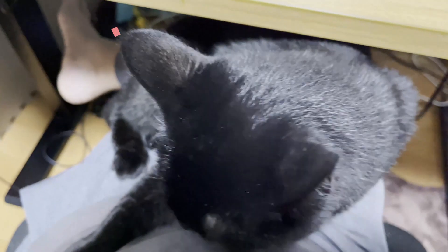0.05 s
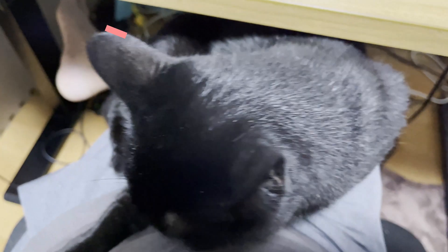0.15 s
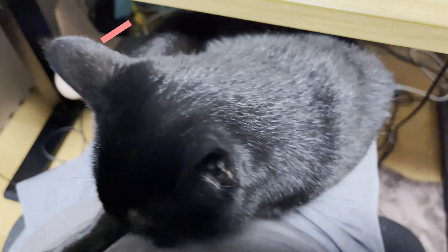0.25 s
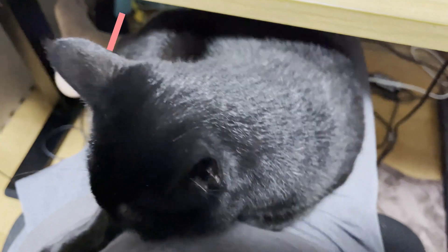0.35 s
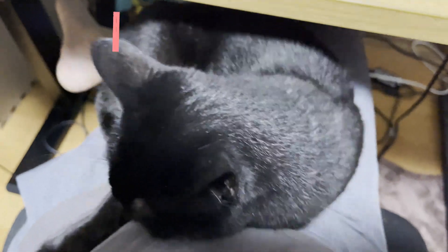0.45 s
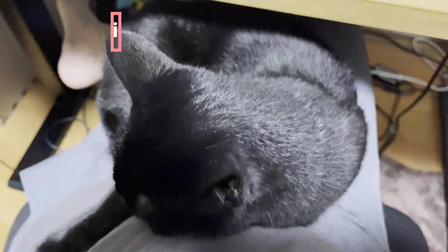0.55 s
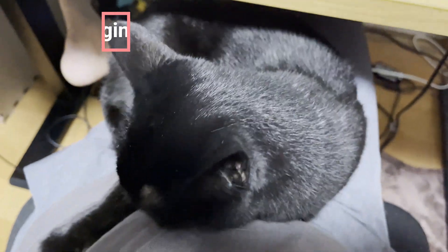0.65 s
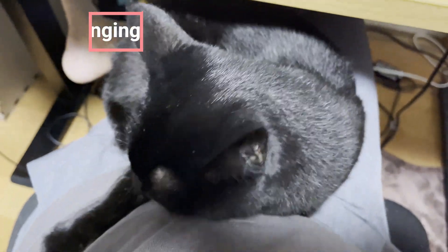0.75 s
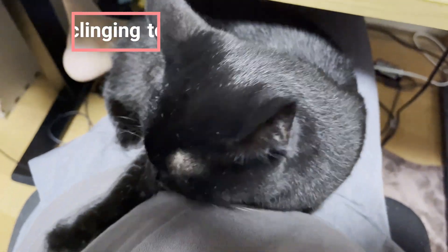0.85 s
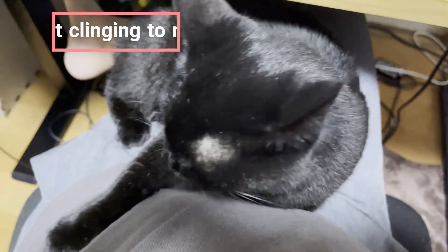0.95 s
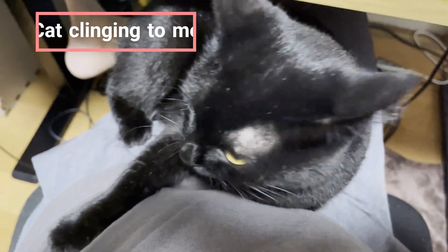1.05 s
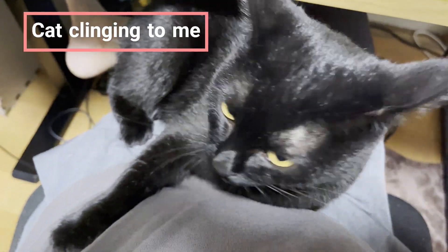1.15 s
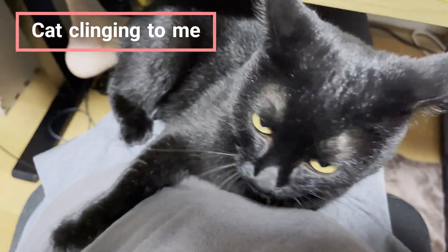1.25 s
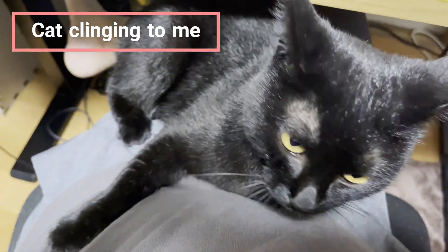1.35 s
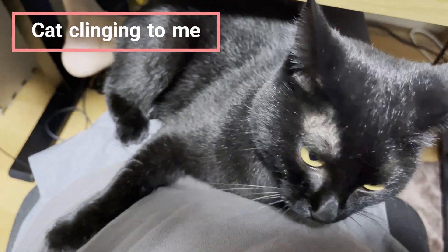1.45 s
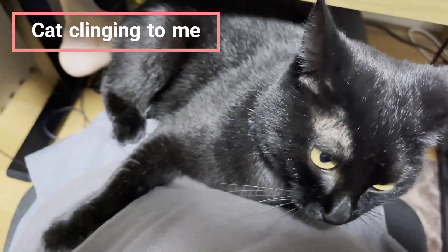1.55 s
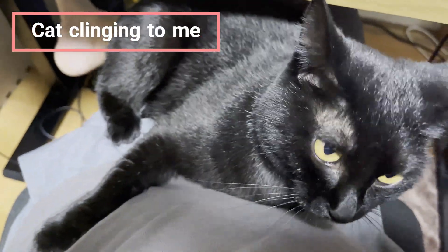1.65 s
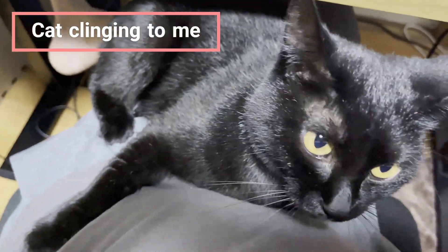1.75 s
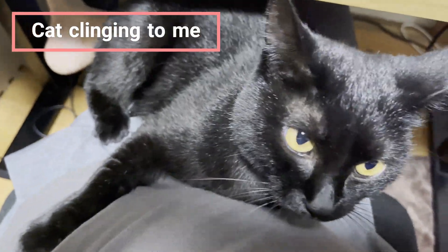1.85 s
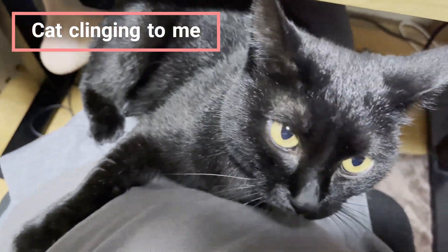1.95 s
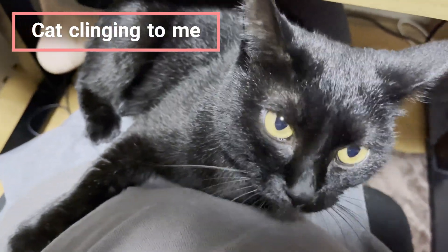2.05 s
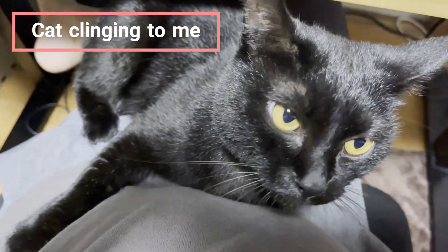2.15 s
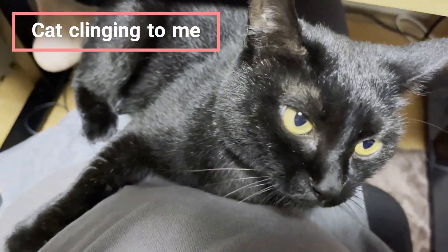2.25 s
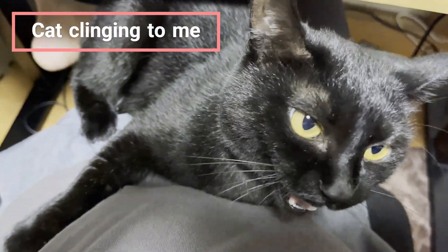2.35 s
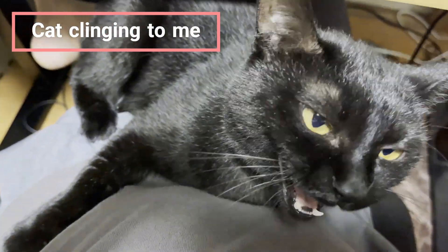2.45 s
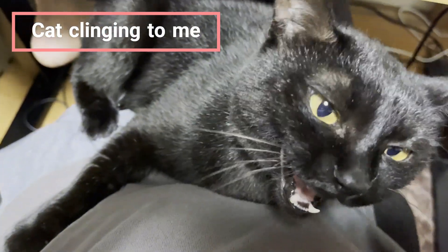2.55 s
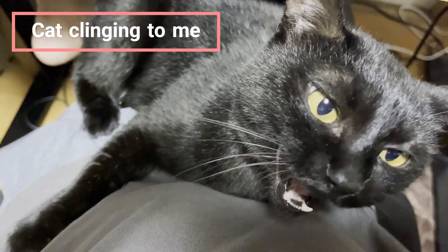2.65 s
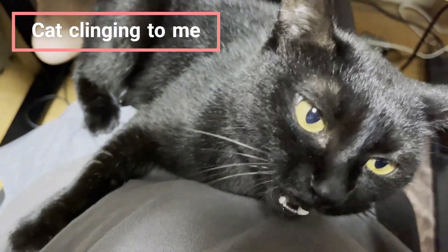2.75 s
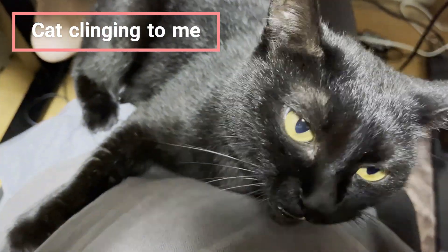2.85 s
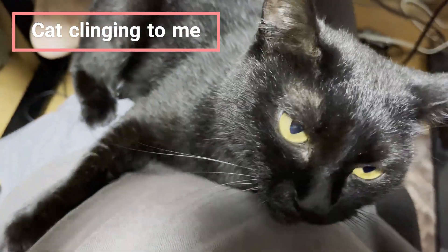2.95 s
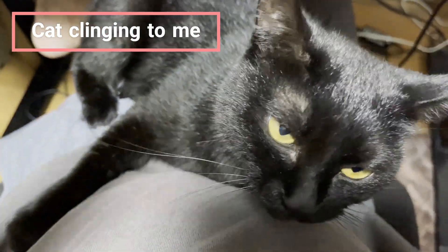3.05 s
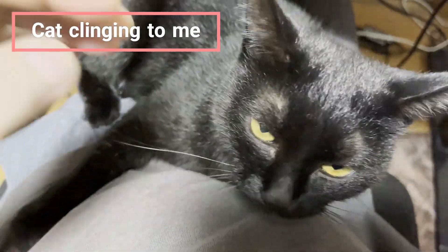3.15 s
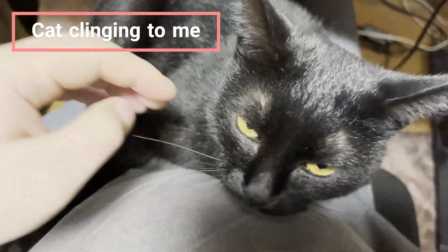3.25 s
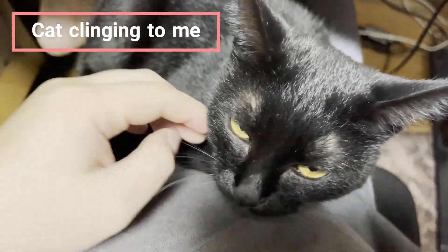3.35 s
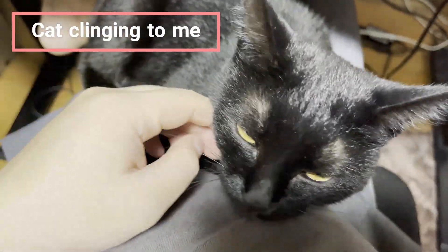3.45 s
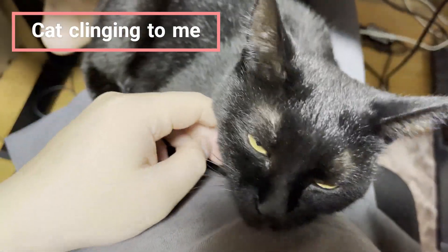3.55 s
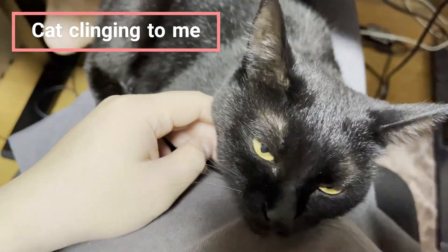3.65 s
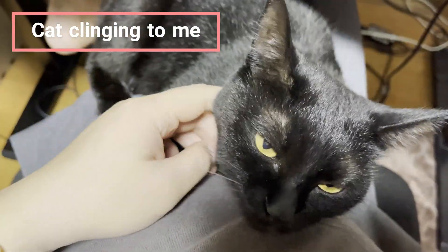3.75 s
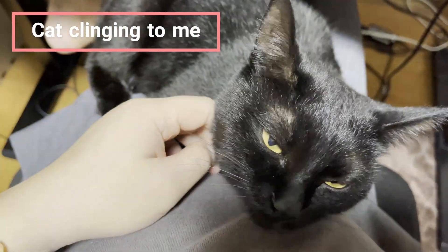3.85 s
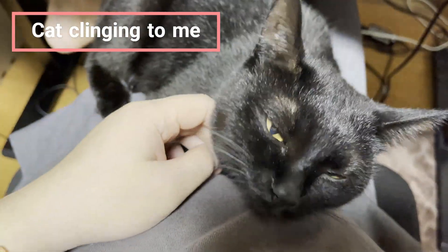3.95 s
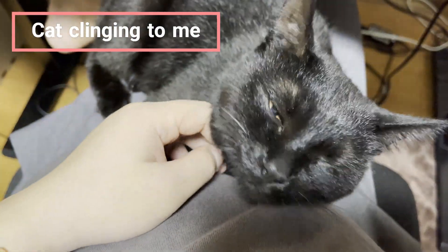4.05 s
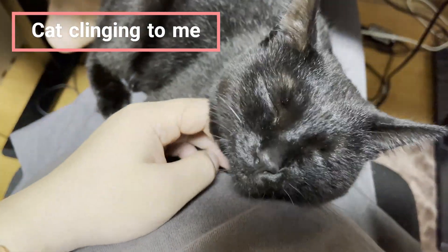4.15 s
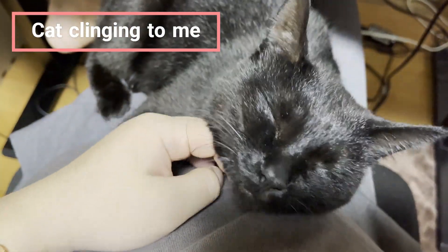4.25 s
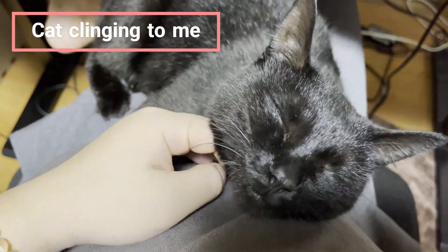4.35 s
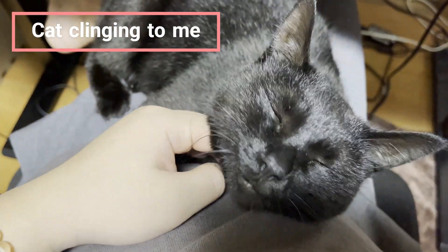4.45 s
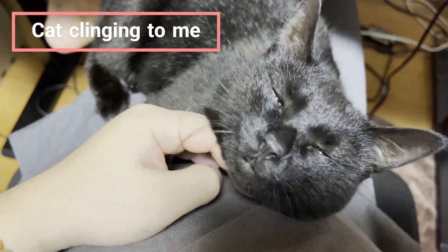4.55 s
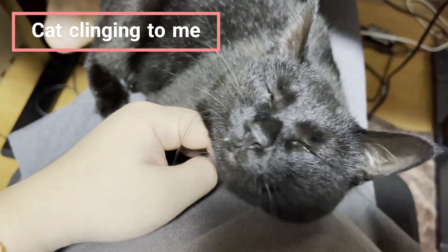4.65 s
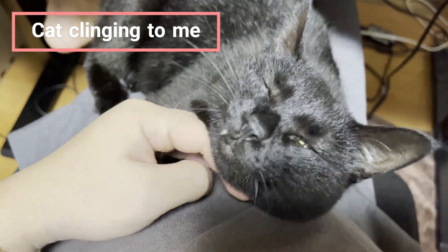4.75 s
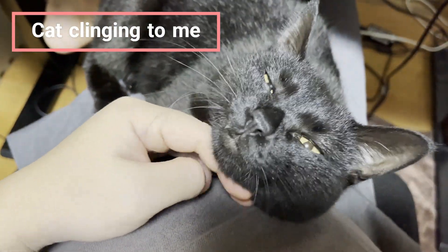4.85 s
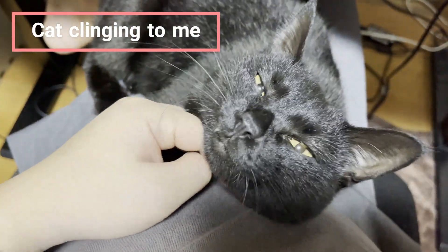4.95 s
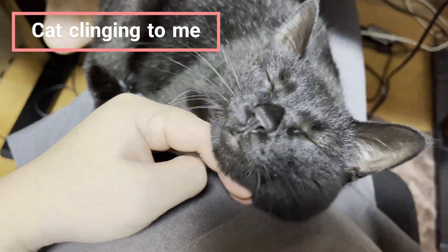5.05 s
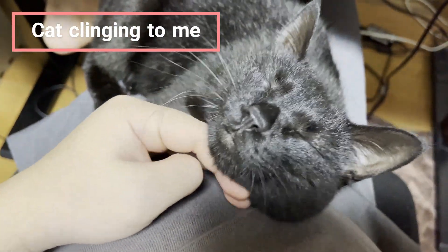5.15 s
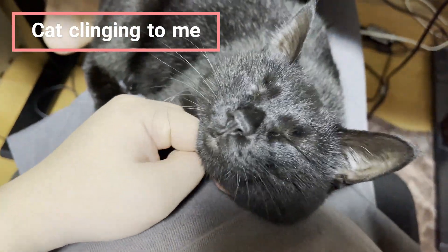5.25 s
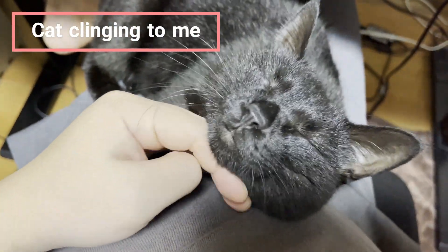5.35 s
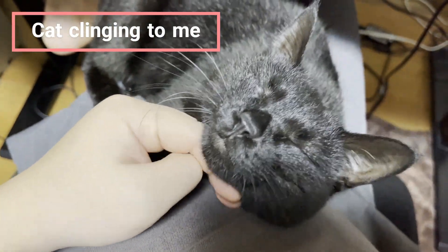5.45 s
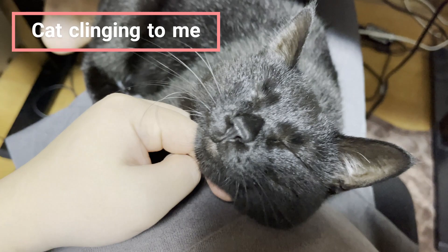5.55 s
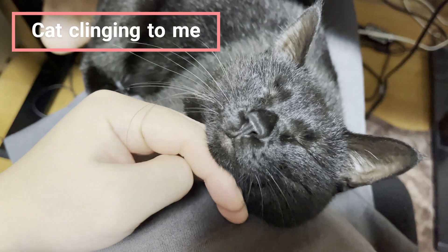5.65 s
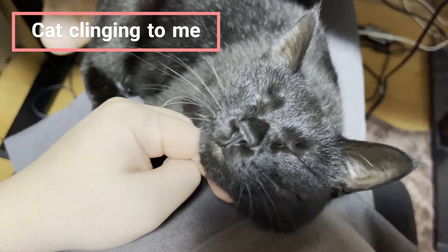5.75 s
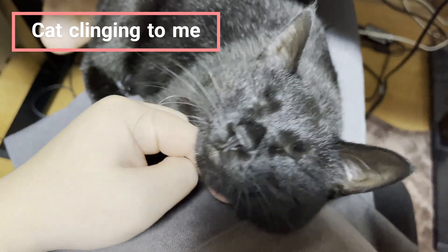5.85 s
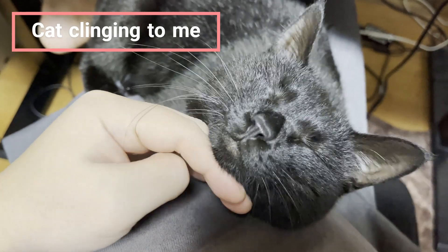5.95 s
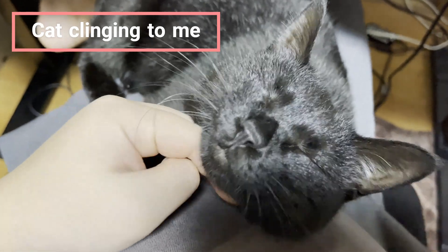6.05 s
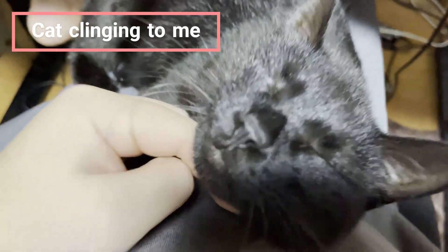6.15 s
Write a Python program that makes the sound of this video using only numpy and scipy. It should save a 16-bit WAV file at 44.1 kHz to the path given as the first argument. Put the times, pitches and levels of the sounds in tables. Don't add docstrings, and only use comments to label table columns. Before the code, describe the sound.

Close stereo phone pickup in a small, dampened room, with low handling rumble and faint airy hiss throughout. From 0 to 0.55 s cloth whispers and crinkles as the cat turns, over a very faint purr of about 25 pulses a second. From 0.6 to 1.4 s single soft throat knocks come unevenly and grow, leading into the strongest rattling out-breath at 1.45-1.75. A softer thumping in-breath follows around 1.9-2.2. Wet clicks at 2.23 open a mew from 2.3 to 3.05, pitched near 500 Hz, bright at first, then muffled and fluttering as the mouth closes, ending with a lip smack. From 3.25 purring returns in short waves, with a rattle near 3.9. Fingers stroke fur from then on, clearer after 4.0, in quick to-and-fro hisses. Wet tongue clicks and a small scrape come near 5.0; purring and stroking continue to 6.2.

```python
import sys
import numpy as np
from scipy import signal
from scipy.fft import rfft, irfft, next_fast_len
from scipy.io import wavfile
from scipy.ndimage import uniform_filter1d, map_coordinates

SR = 44100
rng = np.random.default_rng(int(sys.argv[2]) if len(sys.argv) > 2 else 0)


def generate_wav(signal):
    frames = np.transpose(np.atleast_2d(signal))
    scaled = np.clip(frames, -1, 1) * 32767
    pcm = np.round(scaled).astype(np.int16)
    wavfile.write(sys.argv[1], SR, pcm)


def makeup_ratio(level_db):
    decades = np.asarray(level_db, float) / 20
    return 10 ** decades


N = 272979
T = np.arange(N) / SR

# first t/s, last t/s, twitch rate f/Hz, rattle f/Hz
OUT_BREATHS = [
    (1.448, 1.76, 27.3, 170),
    (3.861, 4.22, 28.3, 160),
    (4.905, 5.15, 27.6, 110),
    (5.99, 6.18, 27.5, 150),
]
# f/Hz, left over right level/dB, right leads phase/rad, likeness of near sound
PORTS = [(60, 4, 0, .95), (500, 7, 0, .95), (1200, 3, -.1, .97), (2200, 2, -1, .93), (2900, 3, .3, .8),
         (3500, 1, 1.7, .85), (4200, 6, 1.3, .85), (4900, 16, -1.4, .7), (5600, 12, -2.9, .8),
         (6400, 6, -2.6, .8), (7000, -2, -1.2, .7), (8000, -1, -.2, .8), (9000, 1, .7, .87),
         (10000, 1, 3, .96), (11000, 1, 4.4, .93), (12000, 0, 6.28, .99)]
# f/Hz, likeness
FAR = [(60, .9), (200, .65), (400, .3), (900, .1), (6000, .1), (9000, .5), (12000, .7)]


def unit(x):
    return x / np.sqrt(np.mean(x ** 2) + 1e-20)


def along(points, x):
    f, *cols = np.transpose(points)
    return np.squeeze([np.interp(np.log(x + 1), np.log(f + 1), c) for c in cols])


def curves(*tables):
    s, *cols = np.concatenate(tables).T
    return [np.interp(T, s, c) for c in cols]


def swell(rows):
    rises = []
    for s, db, rise, fade in rows:
        rises.append(np.interp(T, [s - 4 * abs(rise), s, s + 4 * abs(fade)], [db - 80, db, db - 80]))
    return np.max(rises, 0)


def wobble(rate):
    return map_coordinates(rng.standard_normal(int(N * rate / SR) + 4), [T * rate])


def filtered(x, response):
    m = next_fast_len(N + SR // 2)
    return irfft(rfft(x, m) * response(np.fft.rfftfreq(m, 1 / SR)), m)[..., :N]


def ring(hz, width):
    return lambda f: 1j * f * width / (hz * hz - f * f + 1j * f * width)


def rush(spectrum, alike, grain_db=0.0):
    pair = rng.standard_normal((2, N)) * makeup_ratio(grain_db * wobble(700))
    closed = [(spectrum[0][0] / 2, -120)] + list(spectrum) + [(spectrum[-1][0] * 1.2, -120)]

    def mid_side(hz):
        turn = np.arccos(np.clip(alike(hz), -1, 1)) / 2
        return makeup_ratio(along(closed, hz)) * [np.cos(turn), np.sin(turn)]
    mid, side = filtered(pair, mid_side)
    return unit(np.array([mid + side, mid - side]))


def add(track, s, x):
    part = track[round(s * SR):][:len(x)]
    part += x[:len(part)]


def thump(top_hz, end_hz, fall, t60, attack=0.0048):
    t = np.arange(SR // 12) / SR
    hz = end_hz + (top_hz - end_hz) * np.exp(-t / fall)
    swing = np.sin(2 * np.pi * np.cumsum(hz) / SR)
    return swing * makeup_ratio(-60 * t / t60) * (1 - np.exp(-t / attack))


def room(x, wet_db):
    # f/Hz, t60/s
    walls = [(200, 0.047), (1500, 0.21), (8000, 0.043)]
    hz, t, z = signal.stft(rng.standard_normal((2, SR // 3)), SR, nperseg=256)
    tail = signal.istft(z * makeup_ratio(-60 * t / along(walls, hz)[:, None]), SR, nperseg=256)[1]
    tail = tail / np.linalg.norm(tail[0])
    late = np.pad(x, (200, 0))[None]
    return x + makeup_ratio(wet_db) * signal.fftconvolve(late, tail, axes=1)[:, :N]


def background():
    # t/s, level/dB
    grip = [(0, -79.5), (.4, -74), (.8, -71.5), (1.05, -73.5), (1.4, -68), (2.1, -69.5), (2.5, -70),
            (3.0, -67.5), (3.38, -71.5), (3.6, -67), (4.05, -65), (4.5, -65.5), (4.78, -67), (4.88, -66),
            (5.08, -67), (5.25, -72), (5.6, -66.5), (6.19, -68.5)]
    # strongest t/s, level/dB, time to swell 20 dB /s, to fade 20 dB /s
    shifts = [
        (.4, -72, 0.26, 0.7),
        (2.05, -78.5, 1.8, 0.89),
        (2.3, -70, 0.27, 1.6),
        (4.72, -76, 4.7, 2.3),
    ]
    sniffs = [(0, -63.5, 1., 4.8), (1.13, -63.5, 1.9, 1.3), (1.97, -56.5, 0.34, 0.82),
              (2.6, -62.5, 3.1, 3.4), (3.51, -64.5, 0.26, 0.77), (4.75, -65, 0.88, 0.73),
              (6.06, -56.5, 0.086, 0.22), (6.14, -54, 0.17, 0.061)]
    # f/Hz, level/dB
    rumble_spectrum, hiss_spectrum = [(15, -39), (30, -6), (55, 0), (90, -9), (150, -12), (300, -21),
                                      (700, -45.5)], [(100, 10.5), (300, 13.5), (800, 7), (1500, 10),
                                                      (3000, 1), (5000, -6), (6300, -1), (10000, -4),
                                                      (12500, -10), (13200, -24.5), (15300, -31.5)]
    nose_spectrum = [(300, -14.0), (480, -1.5), (600, -2.5), (720, -11.5), (900, -17.0)]

    def far(hz):
        return along(FAR, hz)
    rumble_db = curves(grip)[0] + 3 + 1.6 * wobble(9)
    hiss_db = np.maximum(swell(shifts), -82) + 3.5 + 1.2 * wobble(8.7)
    air_db = swell(sniffs) - 11.0 + 0.56 * wobble(15)
    rumble = makeup_ratio(rumble_db) * rush(rumble_spectrum, far)
    hiss = makeup_ratio(hiss_db) * rush(hiss_spectrum, far)
    return rumble + hiss + makeup_ratio(air_db) * rush(nose_spectrum, far)


def cloth():
    # strongest t/s, level/dB, time to swell 20 dB /s, to fade 20 dB /s
    whispers = [
        (0, -73, .1, .6),
        (.24, -74.5, 2., .55),
        (.55, -73, .25, .045),
        (.76, -91, .3, .25),
    ]
    crinkles = [
        (.05, -87.5, 0.18, 2.9),
        (.5, -78.5, .03, 1.1),
        (.72, -92.5, 0.36, 0.11),
    ]
    rubs = [
        (0, -70, .1, 2.8),
        (.39, -69, 1.3, 0.44),
        (.52, -72, .2, 0.048),
        (.72, -75, 0.069, 0.15),
    ]
    scuffs = [
        (.3, -77.5, .02, 0.42),
        (.52, -75, 0.046, .06),
        (4.95, -71, .01, .05),
        (5.063, -74.5, .04, 0.037),
        (5.09, -84, .03, .04),
    ]
    # f/Hz, level/dB
    rub_spectrum = [(100, -15), (200, 4.5), (500, -6.5), (900, -2.5), (1600, -3), (3000, -15), (7000, -28),
                    (9000, -53)]
    whisper_spectrum = [(7700, -21), (8050, 7.0), (8500, -3), (9100, -12.0)]
    crinkle_spectrum = [(8500, -9), (9300, 10.0), (10800, 7.0), (12300, -11.0)]
    scuff_spectrum = [(2300, -23), (3000, -6.5), (3900, 1.5), (4500, -7.5), (5600, -21)]

    turning = T < .575
    crinkle_db = np.where(turning, swell(crinkles), swell(crinkles[-1:])) + 7
    rub_db = np.where(turning, swell(rubs), swell(rubs[-2:])) + 2.0 + 1.7 * wobble(14)
    whisper = makeup_ratio(swell(whispers)) * rush(whisper_spectrum, lambda hz: 0.69 + 0 * hz, grain_db=-1.5)
    whisper = whisper * makeup_ratio([[-3.5], [3.5]])
    crinkle = makeup_ratio(crinkle_db) * rush(crinkle_spectrum, lambda hz: 0.5 + 0 * hz, grain_db=3.5)
    rub = makeup_ratio(rub_db) * rush(rub_spectrum, lambda hz: along(FAR, hz), grain_db=0.5)
    scuff = makeup_ratio(swell(scuffs)) * rush(scuff_spectrum, lambda hz: 0.7 + 0 * hz, grain_db=2.0)
    return scuff + whisper + crinkle + rub


def strokes():
    # t/s, share spent speeding up, hiss level/dB, drag level/dB
    to_and_fro = [(3.25, 0.94, -90.5, -85.5), (3.679, 0.095, -84.5, -85), (4.0, 0.78, -75, -76),
                  (4.11, 0.43, -67.5, -72), (4.349, 0.64, -74, -78.5), (4.461, 0.24, -72.5, -74),
                  (4.6, 0.99, -75, -87), (4.715, 0.41, -69, -73.5), (4.868, 0.53, -63, -76.5),
                  (5.006, 0.41, -67.5, -77), (5.152, 0.58, -63.5, -72.5), (5.29, 0.25, -74, -74.5),
                  (5.427, 0.64, -63, -71), (5.561, 0.28, -72, -70), (5.699, 0.7, -66, -70),
                  (5.841, 0.36, -69, -70.5), (5.989, 0.74, -74, -67), (6.13, 0.1, -75, -73.5)]
    start, share, hiss_db, drag_db = np.transpose(to_and_fro)
    edges = np.append(start, 6.24)
    fastest = start + np.clip(share, .1, .9) * np.diff(edges)
    turns = np.interp(T, np.sort(np.append(edges, fastest)), np.arange(2 * len(start) + 1) / 2)
    speed = np.hypot(np.sin(np.pi * turns), 0.12)
    speed_db = 20 * np.log10(speed) - 60 * (T < start[0])
    hiss_power, drag_power = 1.46, 1.14
    fine_db = np.interp(T, fastest, hiss_db) + hiss_power * speed_db
    return fine_db, np.interp(T, fastest, drag_db) + drag_power * speed_db


def fur():
    # f/Hz, level/dB
    fine_spectrum, drag_spectrum = [(5500, -54), (7000, -10), (8500, -3.5), (9500, 2.5), (10700, 10),
                                    (11800, 0), (12600, -23), (14000, -28), (15500, -51)], [(500, -77), (1000, 1), (1700, -1.5), (2500, -6.5),
                                                  (3500, -1), (5000, -5.5), (6500, -1.5), (8000, -3.5)]
    fine_db, drag_db = strokes()
    fine_db = fine_db + 4.0 + 1.34 * wobble(30) + 1.04 * wobble(110)
    drag_db = drag_db - 1.0 + 1.37 * wobble(24)
    drag_alike = [(1900, .3), (2600, -.9), (3300, .3)]
    fine = rush(fine_spectrum, lambda hz: along(PORTS, hz)[2], grain_db=1.5)
    drag = rush(drag_spectrum, lambda hz: along(drag_alike, hz), grain_db=2.5)
    return makeup_ratio(fine_db) * fine + makeup_ratio(drag_db) * drag


def nose():
    # strongest t/s, level/dB, time to swell 20 dB /s, to fade 20 dB /s
    nostril_air = [
        (1.5, -90, 0.33, .5),
        (1.69, -83.5, 0.32, 0.2),
        (1.76, -85.5, .2, .08),
    ]
    # f/Hz, level/dB
    nostrils = [(5000, -14), (6200, -3), (7700, 0), (9200, -5), (11000, -3)]
    first, _, rate, _ = OUT_BREATHS[0]
    spurt_db = 5 * np.cos(2 * np.pi * rate * (T - first - .006))
    return makeup_ratio(swell(nostril_air) + spurt_db) * rush(nostrils, lambda hz: 0.25 + 0 * hz)


def murmur():
    # strongest t/s, level/dB, time to swell 20 dB /s, to fade 20 dB /s
    loose = [(.8, -74, .5, 1), (1.2, -68, 0.63, 0.27), (1.6, -60.5, .3, 0.21), (2.55, -71.5, .3, 0.98),
             (3.02, -66.5, 0.12, 0.17), (3.45, -77, 0.21, 0.74), (3.95, -72.5, 0.28, 0.17),
             (4.45, -78, 0.34, 0.67)]
    exhales = [
        (1.6, -75.5, 0.5, 0.24),
        (1.755, -75, 0.044, 0.061),
        (3.95, -82.5, 0.1, 0.41),
    ]
    # f/Hz, level/dB
    fold_spectrum = [(90, -16.5), (150, 2), (300, 4), (550, -7.5), (720, -18.5), (900, -26)]
    air_spectrum = [(800, -12.5), (1100, 4), (1600, -1), (2100, -7.5), (2600, -10.5), (3000, -20)]
    folds = makeup_ratio(swell(loose) + 0.83 * wobble(60)) * rush(fold_spectrum, np.ones_like)[0]
    return folds + makeup_ratio(swell(exhales) + 3.1 * wobble(90)) * rush(air_spectrum, np.ones_like)[0]


def smacks():
    # t/s, plop level/dB, plop f/Hz, tick level/dB
    clicks = [(.408, -58, 1500, -80), (0.428, -59, 325, -101), (2.233, -59, 1720, -82),
              (2.242, -59, 1480, -79), (2.272, -51, 1400, -75), (2.278, -47.5, 610, -74),
              (2.279, -64, 5050, -99), (2.272, -57, 1950, -99), (2.298, -35.5, 1590, -64),
              (2.3868, -46, 2540, -42), (2.3842, -51, 6300, -99), (2.3846, -56, 4570, -99),
              (2.437, -59, 2100, -44.5), (2.436, -52, 5930, -99), (2.4363, -54, 4300, -99),
              (2.675, -41, 1136, -62.5), (2.994, -52, 1506, -55), (3.002, -47.5, 330, -80),
              (3.005, -52, 1570, -80), (3.018, -52, 1310, -82), (3.024, -53, 1490, -80),
              (3.002, -57, 188, -88.5), (3.05, -49.5, 420, -90), (3.062, -62, 330, -90),
              (3.382, -50.5, 543, -87.5), (3.382, -69.5, 1300, -97), (3.901, -54.5, 1100, -73),
              (3.934, -58, 1100, -67), (4.036, -59, 1340, -71), (4.108, -62, 1150, -90),
              (4.178, -61, 1230, -90), (4.535, -57, 1070, -93), (4.947, -84.5, 1295, -64),
              (4.963, -49, 105, -75), (4.985, -46.5, 115, -90), (4.982, -53.5, 920, -60),
              (5.017, -44.5, 1040, -51.5), (5.017, -43, 500, -99), (5.0175, -61, 3630, -99),
              (5.0163, -59, 8150, -99), (4.982, -65, 3500, -99), (5.065, -58, 1190, -82),
              (5.549, -56.5, 142, -99)]
    # strongest t/s, level/dB, time to swell 20 dB /s, to fade 20 dB /s
    whistles = [
        (2.87, -68.5, .06, .2),
        (2.93, -65.5, .15, 0.097),
        (2.97, -75, .1, 0.034),
    ]
    tongue = [
        (4.95, -78, 0.012, .04),
        (4.962, -76, 0.018, 0.043),
        (5.063, -63.5, 0.028, 0.036),
        (5.085, -72, 0.037, 0.06),
        (5.12, -80, 0.049, 0.049),
    ]
    puffs = [
        (2.673, -64.5, .004, 0.011),
        (2.995, -57.5, 0.012, 0.025),
        (3.01, -62, 0.051, 0.075),
        (3.05, -78.5, 0.13, 0.1),
    ]
    # f/Hz, level/dB
    gap, wet, lips = [(3300, -18), (3800, 6), (4300, -13), (7500, -21), (8600, -17), (10000, -9.5),
                      (11500, -22)], [(700, -17.5), (1100, 4), (1500, -8), (2000, -26), (3200, -25.5),
                                   (3850, -5), (4400, -23)], [(1500, -13.5), (3100, -16.5), (3850, -4.5),
                                                       (4500, -11.5), (6800, -6), (8300, -12), (10200, 5.5),
                                                       (11800, -21)]

    plops, ticks = np.zeros((2, N))
    t = T[:500]
    for s, plop_db, hz, tick_db in clicks:
        attack = min(.0006 + .7 / hz, .0022)
        add(plops, s, makeup_ratio(plop_db + 7) * thump(1.2 * hz, .8 * hz, .003, .007 + 6 / hz, attack=attack))
        burst = rng.standard_normal(500) + 4 * (t == 0)
        add(ticks, s, makeup_ratio(tick_db + 8 - 60 * t / .012) * burst)

    def mouth(f):
        low, middle = 0.28 * ring(1400, 800)(f), 1.8 * ring(3500, 1000)(f) ** 2
        high = 0.83 * ring(7500, 2600)(f) ** 3
        return (low - middle + high) / (1 + (f / 9000) ** 6)
    whistle = makeup_ratio(swell(whistles)) * rush(gap, np.ones_like, grain_db=-1.0)[0]
    licks = makeup_ratio(swell(tongue)) * rush(wet, np.ones_like, grain_db=3.5)[0]
    puff = makeup_ratio(swell(puffs)) * rush(lips, np.ones_like, grain_db=2.0)[0]
    return plops + filtered(ticks, mouth) + whistle + licks + puff


def mew():
    # t/s, pitch f/Hz, level/dB, mouth resonance f/Hz
    opening, shut = [(2.297, 451, -43, 2190), (2.38, 517.2, -36, 2500), (2.412, 539, -35, 2800),
                     (2.445, 532.3, -34.5, 2628), (2.49, 546.8, -32.5, 2750), (2.54, 557, -33, 2370),
                     (2.58, 546.8, -31.5, 2160), (2.615, 525.7, -35.5, 1626), (2.672, 514.3, -42, 1440)], [(2.688, 511.5, -35.5, 1400), (2.714, 508, -37, 1400),
                                       (2.742, 491.4, -37.5, 1400), (2.815, 500.5, -38, 1400),
                                       (2.895, 479.5, -38, 1400), (2.974, 444.7, -38.5, 1400),
                                       (2.994, 432, -53, 1270), (3.004, 528.4, -48.5, 1100),
                                       (3.024, 513, -54.5, 1222), (3.05, 476, -89, 1100)]
    gape = [(1100, 8, -23, -34), (1270, 16.5, 19, -32), (1400, -1.5, -6.5, -57), (1480, -9, -12.5, -30),
            (1800, -12.5, 1.5, -24), (2140, -11, -4, -22.5), (2500, -11.5, -4, -15.5),
            (2750, -11, -5, -14.5)]
    # t/s, pitch drop 0-1
    twitches = [(2.792, 0.08), (2.828, 0.15), (2.866, 0.19), (2.901, 0.15), (2.94, 0.18), (2.979, 0.22),
                (3.015, 0.2)]
    # number, level/dB re second
    skirt = [(2, 0), (3, -9), (4, -35.5), (5, -29.5), (6, -53), (7, -43.5), (8, -39.5), (9, -51),
             (12, -62.5), (24, -70)]
    # f/Hz, level/dB
    teeth_response = [(3000, -29), (3500, -0.5), (4500, -8), (5200, -3), (6000, 3.5), (7000, -7.5),
                      (7700, -25), (8600, -29.5), (10500, -22.5), (12000, -58)]
    # t/s, level/dB
    cheek = [(2.3, -68.5), (2.335, -47.5), (2.36, -64), (2.4, -51.5), (2.47, -53.5), (2.53, -64.5),
             (2.56, -56.5), (2.6, -76.5), (2.67, -83)]
    # t/s, hollow f/Hz, width f/Hz, depth level/dB, brightness level/dB
    tongue = [(2.3, 3950, 1100, 27.5, 0.5), (2.36, 4270, 900, 18.5, 1.5), (2.39, 3860, 650, 11, -0.5),
              (2.43, 4800, 650, 6.5, 2.5), (2.47, 5000, 650, 8.5, 2.5), (2.526, 6560, 650, 4.5, -2),
              (2.56, 4850, 650, 1, 3.5), (2.59, 3700, 650, 19, 2.5), (2.66, 4167, 654, 17, -2.5)]
    # t/s, share of a cycle skipped
    catches = [
        (2.384, .07),
        (2.436, .09),
    ]
    top_hz = 12000

    pitch, second_db, mouth_hz = curves(opening, shut)
    first_db, mouth_db, teeth_db = second_db + along(gape, mouth_hz)
    sag = sum(drop * (T > s) * np.exp(-np.abs(T - s) / .0105) for s, drop in twitches)
    sag = uniform_filter1d(uniform_filter1d(sag, size=200), size=70)
    start, end = opening[0][0], shut[-1][0]
    on = slice(round(start * SR), round(end * SR))
    t = T[on]
    hz = (pitch * (1 - sag + .0035 * wobble(120) + .004 * wobble(450)))[on]
    k = np.arange(1, 25)[:, None]

    body = makeup_ratio(second_db[on] + along(skirt, k)[:, None])
    body[0] = makeup_ratio(first_db[on])
    body[3] *= makeup_ratio(10 * np.clip((t - 2.77) / .1, 0, 1))
    mouth = makeup_ratio(mouth_db[on] - 5.3 * ((k * hz - mouth_hz[on]) / 300) ** 2)
    is_open = t < cheek[-1][0]
    cheek_hz = np.where(is_open, 3050, 2500)
    cheek_db = np.where(is_open, curves(cheek)[0][on], second_db[on] - 32.5)
    mouth = mouth + makeup_ratio(cheek_db - 12.0 * ((k * hz - cheek_hz) / 280) ** 2)

    hollow_hz, wide_hz, hollow_db, bright_db = [c[on] for c in curves(tongue)]
    tongue_db = bright_db - hollow_db * np.exp(-((k * hz - hollow_hz) / wide_hz) ** 2)
    knots = np.broadcast_arrays(k, 40 * (t - start))
    shift_db = 2.5 * map_coordinates(rng.standard_normal((25, 40)), knots, order=1)
    teeth = makeup_ratio(teeth_db[on] + tongue_db + along(teeth_response, k * hz) + shift_db) * (k > 5)

    skipped = sum(share * (1 + np.tanh((t - s) * 2 / .0016)) / 2 for s, share in catches)
    phase = k * 2 * np.pi * (np.cumsum(hz) / SR + skipped) - .1 * k * k
    partials = np.sum((body + mouth + teeth) * np.cos(phase), 0)
    call = np.zeros(N)
    call[on] = np.sqrt(2) * partials * makeup_ratio(-28 * sag[on]) * np.minimum((t - start) / 0.0027, 1)

    breathy = rng.standard_normal(N) * makeup_ratio(-22.5 + 60 * sag) * np.abs(call)
    hissy = rng.standard_normal(N) * makeup_ratio(teeth_db + 6.5 + 2.5 * wobble(150)) * (T > start) * (T < end)

    def past_teeth(f):
        tilt_db = 7.7 * (f > 7500) - 3.5 * (f < 5000)
        return makeup_ratio(along(teeth_response, f) + tilt_db) * (f > 2500) * (f < top_hz)
    voice = call + filtered(breathy, lambda f: ring(1400, 2000)(f) ** 3)
    return filtered(voice, lambda f: f < top_hz) + filtered(hissy, past_teeth)


def purr_in():
    # first t/s, last t/s, twitch rate f/Hz
    breaths = [(.012, .56, 24.5), (1.877, 2.19, 23.4), (3.256, 3.48, 24.1), (3.545, 3.65, 24.6),
               (3.706, 3.8, 23.5), (4.274, 4.5, 23.9), (4.528, 4.75, 25), (5.426, 5.64, 25.0),
               (5.706, 5.95, 24.5)]
    # strongest t/s, chest level/dB, swell rate dB/s, fade rate dB/s, throat level/dB re chest
    effort = [(.04, -68.5, 76, 59, 5.5), (1.93, -55, 69, 41, -2.5), (3.401, -56, 112, 63.5, -0.5),
              (3.58, -61, 41.5, 60.5, -5.5), (3.75, -68, 76, 58, -3), (4.4, -57, 36, 30, -2),
              (4.53, -58, 76, 27, -8.5), (5.62, -56.5, 82, 29.5, -7.5), (5.75, -66, 73.5, 57, -22.5)]
    chest, throat, slush = np.zeros((3, N))
    t = T[:2000]
    for (first, last, rate), (peak, db, rise, fade, throat_db) in zip(breaths, effort):
        for s in np.arange(first, last, 1 / rate):
            late, size, tone = rng.standard_normal(3)
            under = max(rise * (peak - s), fade * (s - peak))
            low = thump(334, 70 * makeup_ratio(tone), 0.0061, 0.072, attack=0.0059)
            add(chest, s + 0.0009 * abs(late), makeup_ratio(db - under + 0.94 * size) * low)
            high_db = db + throat_db - 1.64 * under + 1.2 * size
            high = thump(448, 290 * makeup_ratio(tone), 0.0045, 0.047)
            add(throat, s + 0.00087 * abs(late), makeup_ratio(high_db) * high)
            wet = np.minimum(t / 0.012, 1) * rng.standard_normal(2000)
            add(slush, s, makeup_ratio(db - under - 60 * t / 0.037) * wet)
    return chest + makeup_ratio(-0.5) * throat + makeup_ratio(3.0) * filtered(slush, lambda f: ring(330, 450)(f) ** 2)


def purr_out():
    # strongest t/s, chest level/dB, fade rate dB/s, throat level/dB re chest
    effort = [
        (1.579, -43, 90, -2.5),
        (3.936, -52.5, 73, -11),
        (4.993, -54.5, 294, -6.5),
        (6.06, -70, 38.5, -11),
    ]
    mouth_levels = [
        -22,
        -27,
        -41,
        -36,
    ]
    chest, throat, taps = np.zeros((3, N))
    t = T[:1200]
    for breath, (peak, db, fade, throat_db), mouth_db in zip(OUT_BREATHS, effort, mouth_levels):
        first, last, rate, rattle_hz = breath
        for s in np.arange(first, last, 1 / rate):
            under = max(111 * (peak - s), fade * (s - peak))
            edge_db = 7 * (min(s - first, last - s) < .03)
            for k, (late, size) in enumerate(rng.standard_normal((4, 2))):
                at = s + (k + .08 * late) / rattle_hz
                gain = makeup_ratio(db + 1.2 * size - 2.3 * (k - 1.2) ** 2)
                low = thump(236, 1.27 * rattle_hz * makeup_ratio(0.27 * late), 0.0083, 0.038, attack=0.0022)
                add(chest, at + 0.00302, 0.57 * gain * makeup_ratio(-under) * low)
                high = thump(573, 420 * makeup_ratio(1.04 * size), 0.0013, 0.037, attack=0.0055)
                add(throat, at + 0.00214, 0.61 * gain * makeup_ratio(throat_db - under) * high)
                tap_db = mouth_db - 0.69 * under - edge_db + 1.6 * (k < 1) - 10 * (k > 2)
                tap = 2.56 * thump(1490, 1300 * makeup_ratio(0.82 * late), 0.0011, 0.0042, attack=0.00039)[:1200]
                tap = tap + 1.1 * makeup_ratio(-60 * t / 0.028) * rng.standard_normal(1200)
                add(taps, at, gain * makeup_ratio(tap_db) * tap)

    def mouth(f):
        low, middle = 0.28 * ring(1050, 700)(f) ** 2, 0.081 * ring(1700, 800)(f) ** 2
        return low - middle - 0.053 * ring(2550, 500)(f) ** 3
    return chest + makeup_ratio(-0.5) * throat + makeup_ratio(17.5) * filtered(taps, mouth)


def slow_twitches():
    # t/s, peak level/dB, throat f/Hz
    singles = [(0.596, -55, 378), (0.635, -56.5, 204), (0.672, -54.5, 231), (0.72, -50.5, 229),
               (0.775, -54.5, 370), (0.846, -52, 379), (0.909, -51, 368), (0.97, -55, 384),
               (0.985, -52, 201), (1.032, -49.5, 370), (1.122, -58, 287), (1.178, -50.5, 362),
               (1.207, -48.5, 197), (1.25, -51.5, 360), (1.285, -49.5, 250), (1.321, -48, 376),
               (1.339, -50, 176), (1.374, -45.5, 356), (1.416, -56, 150)]
    slow = np.zeros(N)
    for s, db, hz in singles:
        late, size, tone = rng.standard_normal(3)
        slap = thump(hz * 2.29, hz * 0.967, 0.0014, 0.038, attack=0.0037)
        click = thump(hz * 2.1, hz * 1.55, 0.002, 0.013, attack=0.0012)
        rebound = thump(hz * 0.995, hz * 0.94 * makeup_ratio(tone), 0.0055, 0.035)
        add(slow, s, makeup_ratio(db + 4.5) * slap)
        add(slow, s + .002, makeup_ratio(db - 1.5 + 2 * tone) * click)
        add(slow, s + 0.00794 + 0.0018 * late, makeup_ratio(db - 1.5 + 2 * size) * rebound)
    return slow


def purr():
    return makeup_ratio(14.5) * (purr_in() + purr_out()) + slow_twitches()


def scene():
    beside = background() + cloth() + fur()
    voice = room(mew() + smacks(), wet_db=-16.0)
    return beside + nose() + voice + room(purr() + murmur(), wet_db=-12.5)


def top_cut(x):
    return signal.sosfilt(signal.butter(12, 15350, fs=SR, output="sos"), x)


def record(dry):
    def ports(hz):
        side_db, lead, _ = along(PORTS, hz)
        level = makeup_ratio(side_db * [[.5], [-.5]]) * (hz < 15350)
        return level * np.exp(1j * lead * [[-.5], [.5]])
    return top_cut(filtered(dry, ports))


dry = scene()
out = record(dry)
generate_wav(out)
```